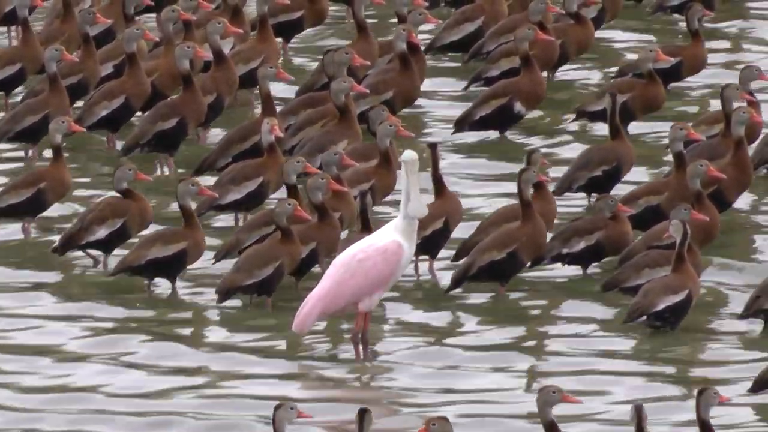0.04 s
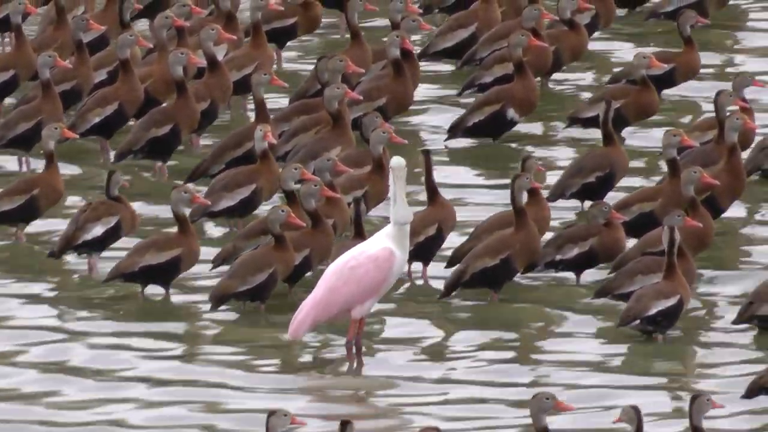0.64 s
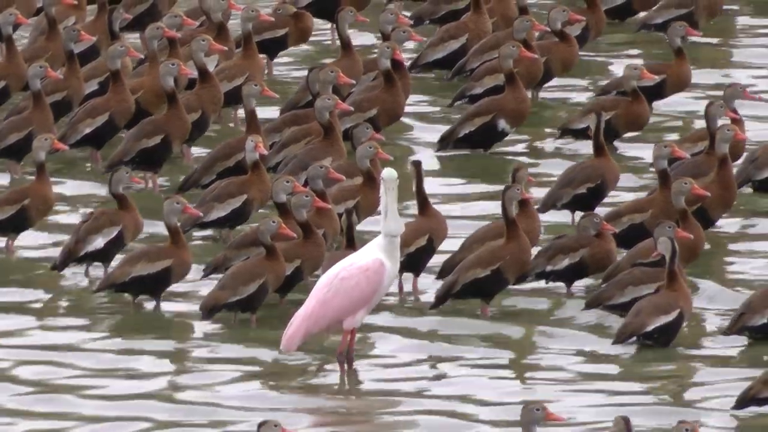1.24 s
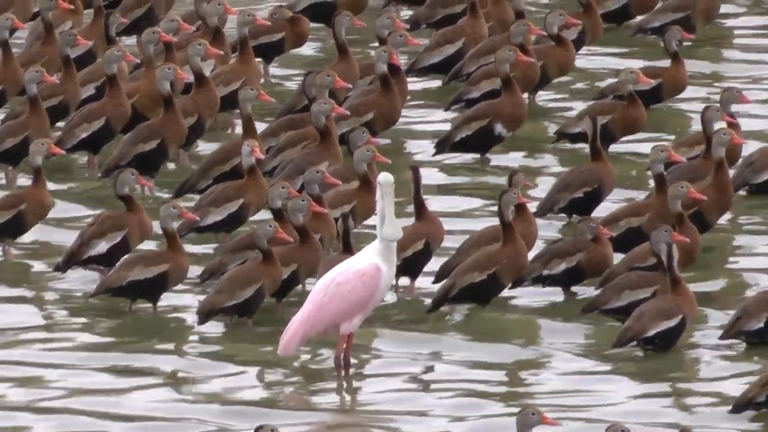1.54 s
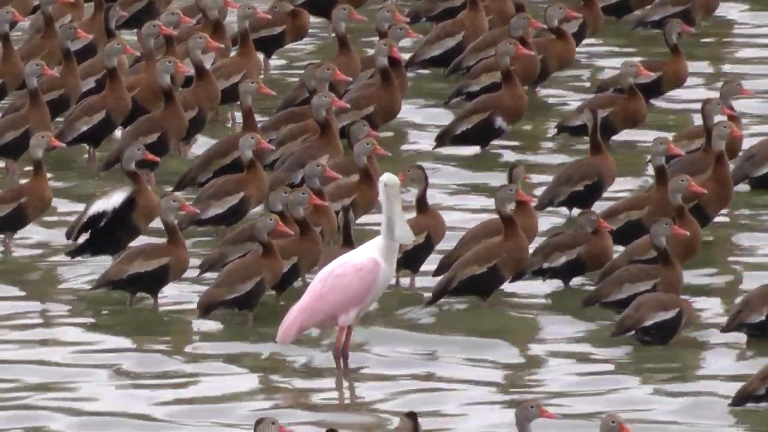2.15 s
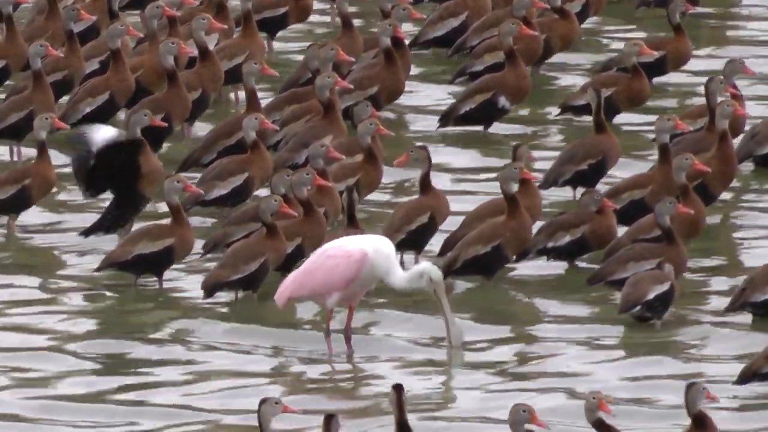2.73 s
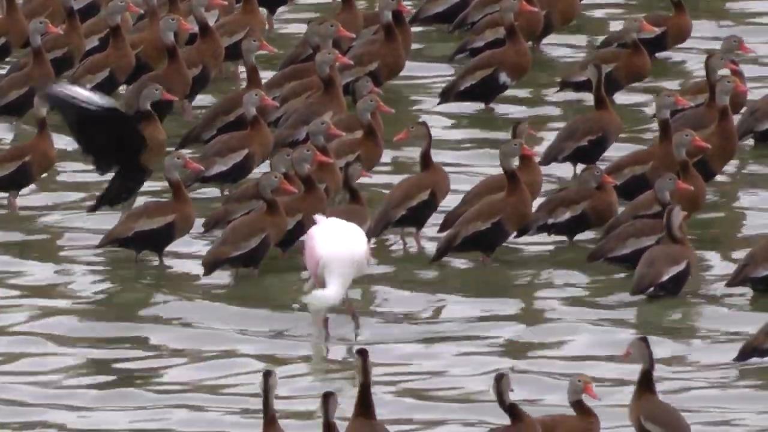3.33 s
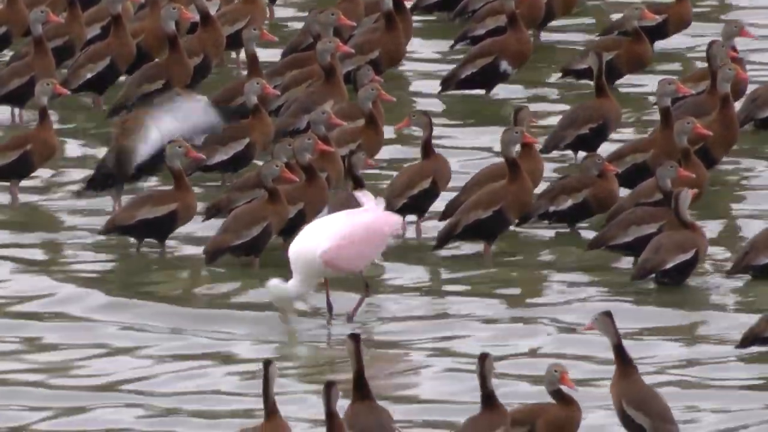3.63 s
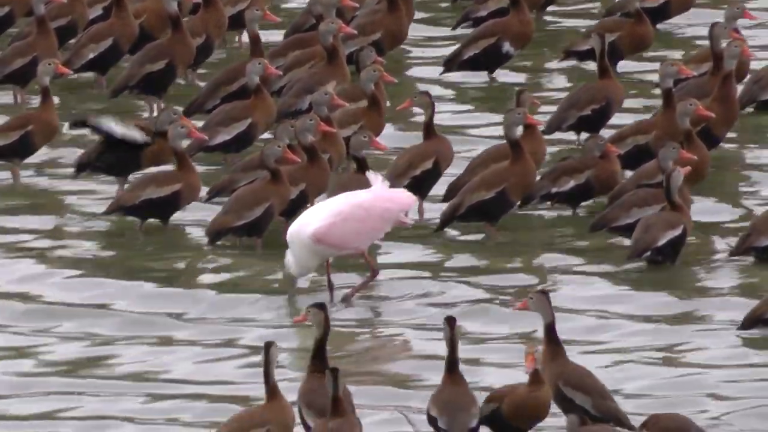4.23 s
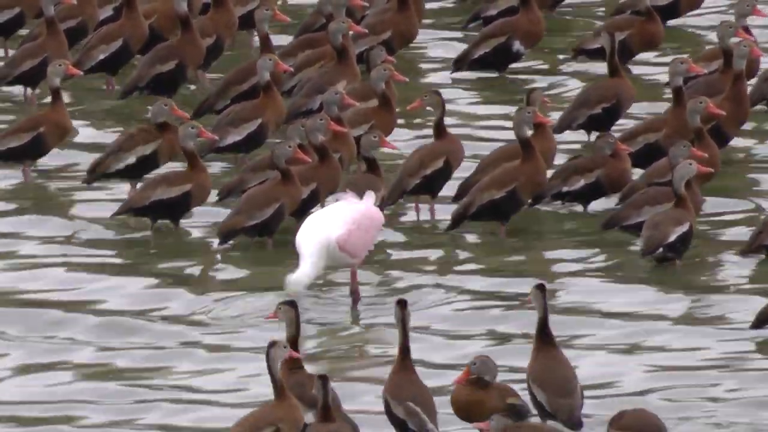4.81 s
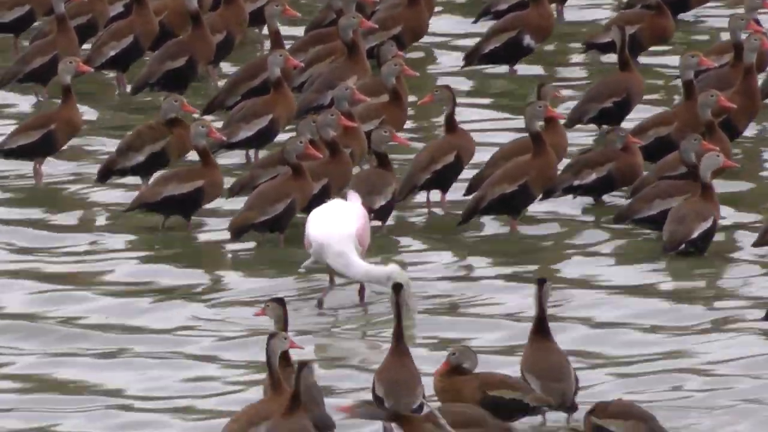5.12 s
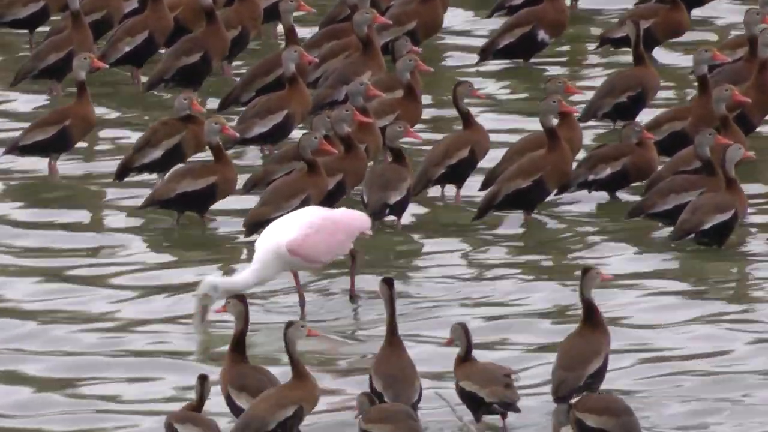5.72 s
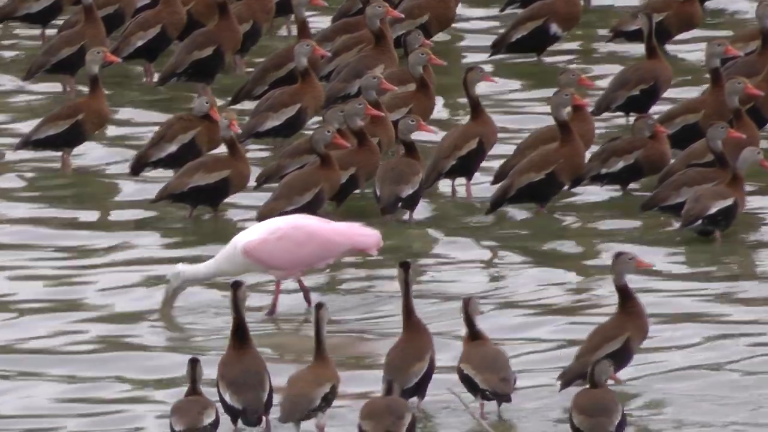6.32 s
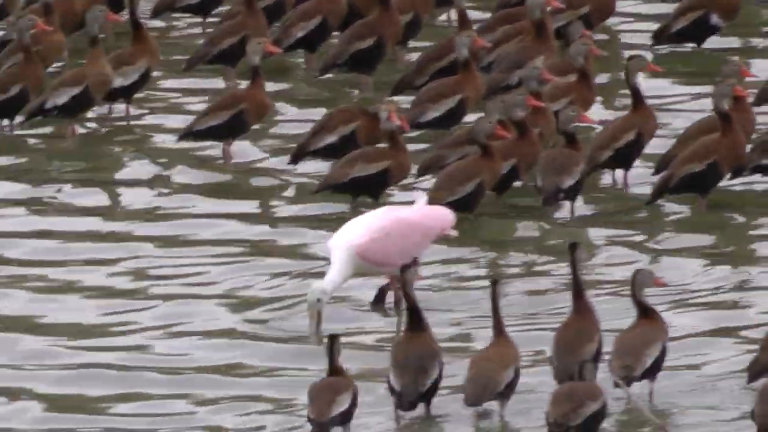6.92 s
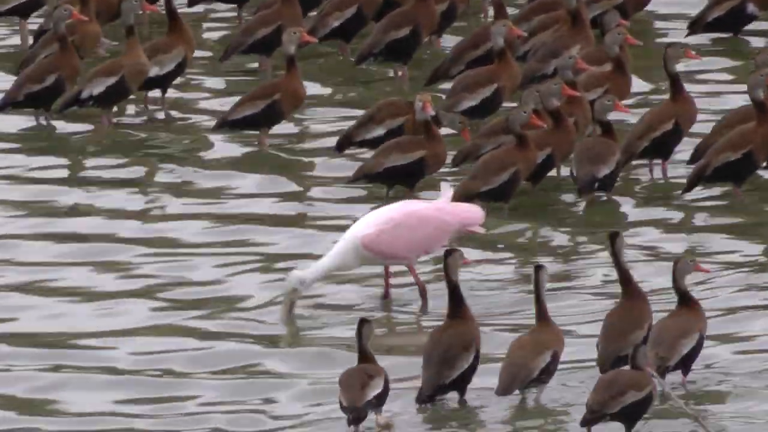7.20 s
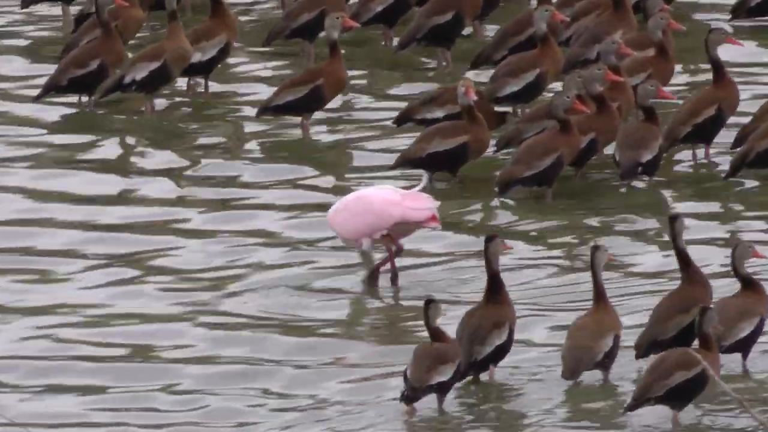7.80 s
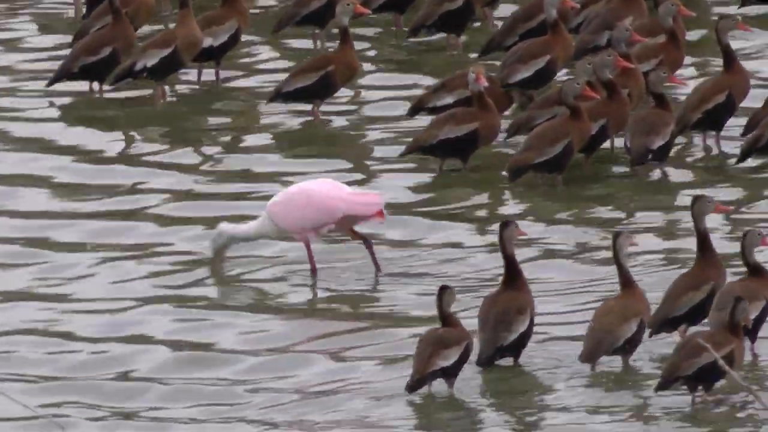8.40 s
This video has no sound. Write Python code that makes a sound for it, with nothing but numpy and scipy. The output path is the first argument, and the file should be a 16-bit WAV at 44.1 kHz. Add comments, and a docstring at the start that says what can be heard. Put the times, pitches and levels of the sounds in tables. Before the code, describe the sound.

Hundreds of ducks whistle and peep, one close duck giving rising cries, while a far engine idles and something small ticks.

```python
"""Hundreds of whistling ducks chatter in shallow water from the start, near birds whistling and chirping
on top, while a distant engine idles unevenly and something small close by ticks about three times a second.
Almost at once, one close duck gives a run of cries that climb in steps. Just after 3 s a far bird adds two
soft, low notes. Around 5 s the close duck cries again and the engine pulls briefly, then slows and fades.
The flock and the ticking carry on to the end."""
import sys
import numpy as np
from scipy import signal
from scipy.fft import rfft, irfft, next_fast_len
from scipy.io import wavfile
from scipy.ndimage import uniform_filter1d, map_coordinates

SR = 44100
rng = np.random.default_rng(int(sys.argv[2]) if len(sys.argv) > 2 else 0)


def pcm_store(signal):
    """Save signal as 16-bit PCM."""
    levels = np.round(np.clip(np.atleast_2d(signal), -1, 1) * 32767)
    wavfile.write(sys.argv[1], SR, levels.astype(np.int16).T)


N = 377055

# how well a duck's throat lets each frequency out: frequency_hz, gain_db
THROAT_TONE = [(1200, -67), (1700, -15.5), (2300, 0), (6500, 0.5), (8000, -4), (10500, -11.5), (12000, -19),
               (16000, -38)]


def amp(db):
    """Turn decibels into a number to multiply by."""
    return 10 ** (np.asarray(db) / 20)


def unit(x):
    """Scale a sound to an average (rms) level of 1."""
    return x / np.sqrt(np.mean(x ** 2) + 1e-20)


def along(points, hz):
    """Read between the rows of a (frequency_hz, value) table, with octaves evenly spaced."""
    known_hz, values = np.transpose(points)
    return np.interp(np.log(hz + 1), np.log(known_hz + 1), values)


def curves(rows):
    """Turn each column after the time into a line with one value per sample."""
    times, *columns = np.transpose(rows)
    return [np.interp(np.arange(N) / SR, times, column) for column in columns]


def wobble(rate, size):
    """A smooth curve through `rate` random values a second."""
    return map_coordinates(rng.standard_normal(int(size * rate / SR) + 4), [np.arange(size) * rate / SR])


def filtered(x, response):
    """Multiply each frequency in a sound by response(hz)."""
    size = next_fast_len(N + SR // 2)
    return irfft(rfft(x, size) * response(np.fft.rfftfreq(size, 1 / SR)), size)[..., :N]


def coloured(x, tone):
    """Shape a sound's tone with a (frequency_hz, gain_db) table."""
    return filtered(x, lambda hz: amp(along(tone, hz)))


def noise(tone):
    """Stereo noise with the given tone, at an average level of 1."""
    # stereo width of the noise; the high treble is nearly mono: frequency_hz, side_db
    stereo_width = [(60, -13.5), (250, -10.5), (700, -8), (3000, -11.5), (8000, -13.5), (12000, -43)]
    middle, side = coloured(rng.standard_normal((2, N)), tone)
    side = coloured(side, stereo_width)
    return unit(np.array([middle + side, middle - side]))


def add(out, start_s, sound, pan_db):
    """Mix a sound in at start_s, pan_db louder on the left."""
    start = int(start_s * SR)
    first, end = max(start, 0), min(start + len(sound), N)
    if end > first:
        out[:, first:end] += amp([[pan_db / 2], [-pan_db / 2]]) * sound[first - start:end - start]


def open_air():
    """A faint, steady rush, a little louder on the left."""
    # tone of the air: frequency_hz, gain_db
    air_tone = [(100, 4.5), (500, -4), (620, -1.5), (800, 5), (950, -11), (1280, -16), (1420, -3),
                (1570, -14.5), (3000, -2.5), (8000, -54), (12000, -26.5), (16000, -26.5)]
    return amp(-56.5) * noise(air_tone) * amp([[.8], [-.8]])


def far_flock(count=1700, spread_db=3.5, overtone_db=-8):
    """Many birds give short rounded chirps at random, a few a longer note; the farthest melt into a rush."""
    # how the flock swells and sinks: time_s, level_db
    flock_levels = [(0, -46.5), (1.5, -48.5), (2.6, -46), (3.8, -50), (5.5, -47.5), (6.5, -50),
                    (7.1, -50.5), (7.8, -48), (8.55, -49)]
    # tone of the chatter: frequency_hz, gain_db
    chatter_tone = [(900, -51), (1550, -13), (1850, 1.5), (2300, 1.5), (2900, -0.5), (3500, -1.5),
                    (4400, 0), (6600, -5.5), (8500, -17), (11000, -21.5), (15000, -40)]
    calls = np.zeros((2, N))
    birds = zip(rng.random((count, 3)), rng.standard_normal((count, 4)))
    for (when, high, long), (loud, pan, bend, tilt) in birds:
        length_s = .035 + .035 * long + .07 * long ** 8
        place = np.linspace(-1, 1, int(length_s * SR))  # -1 at the start of the note, 1 at its end
        pitch = 2300 * 2.9 ** high * np.exp(-(.17 + .05 * bend) * place ** 2 + .08 * tilt * place)
        phase = 2 * np.pi * np.cumsum(pitch) / SR
        voice = (np.sin(phase) + amp(overtone_db) * np.sin(2 * phase)) * (1 - place ** 4)
        add(calls, when * N / SR - length_s / 2, amp(spread_db * min(loud, 1.5)) * voice, 2.8 * pan - .8)
    level_db, = curves(flock_levels)
    rush = .62 * noise(chatter_tone)
    return amp(level_db - 1) * (unit(coloured(calls, chatter_tone)) + rush)


def duck_voice(pitch, overtone_db, half_db, third_db, jitter, flutter_db, break_db):
    """A whistle with overtones that come and go, and weak extra tones halfway between them."""
    size = len(pitch)
    phase = 2 * np.pi * np.cumsum(pitch * (1 + jitter * wobble(351, size))) / SR
    shrill_db = .85 * overtone_db + third_db  # a strong overtone makes the higher ones strong too
    # tones around the whistle: pitch_multiple, level_db
    tones = [(.5, half_db), (1.5, half_db - 8), (2, overtone_db),
             (2.5, shrill_db - 9), (3, shrill_db), (4, shrill_db - 4)]
    # overtones swell and dip as the pitch glides, in ripples about 1881 Hz apart
    ripple = 2 * np.pi * pitch / 1881 * (1 + rng.standard_normal() / 10)
    extras = 0
    for multiple, db in tones:
        level_db = db + 4 * np.cos(multiple * ripple) + break_db * np.minimum(wobble(52, size), 1)
        extras += amp(level_db) * np.sin(multiple * phase) * (multiple * pitch < SR / 2)
    # a gliding note flutters more than a held one
    glide = np.minimum(np.abs(uniform_filter1d(np.gradient(pitch), size=400)) * SR / 20000, 1)
    flutter = amp(flutter_db * (.35 + glide) * wobble(160, size))
    return np.sqrt(2) * (np.sin(phase) + extras) * flutter


def whistle_shape(length_s, early_hz, late_hz, sag):
    """Pitch and strength of a held note: it swings up, drifts steadily and drops away."""
    t = np.arange(int(length_s * SR)) / SR
    edge_s = min(length_s / 3, .036)
    rise = np.clip(1 - t / edge_s, 0, 1)
    fall = np.clip(1 - (length_s - t) / edge_s, 0, 1)
    held_hz = early_hz + (late_hz - early_hz) * (t - edge_s) / (length_s - 2 * edge_s)
    return held_hz * (1 - sag * (.87 * rise ** 2 + fall ** 2)), 1 - np.maximum(rise, fall) ** 3.7


def chirp_shape(length_s, pitch_hz, glide, arch=.0893):
    """Pitch and strength of a short note: one arch, tilted by the glide (a share of the pitch)."""
    place = np.linspace(-1, 1, int(length_s * SR))
    return pitch_hz * (1 + glide * place / 2 - arch * place ** 2), 1 - np.abs(place) ** 4


def near_notes():
    """Every whistle, chirp and peep as (start_s, pitch, strength, level_db, overtone_db)."""
    # held whistles, whose ends sag in pitch:
    # start_s, length_s, early_hz, late_hz, sag_share, level_db, overtone_db
    whistles = [(-.03, 0.15, 3436, 3665, 0.11, -35.5, -16.5), (-.03, .17, 2984, 2956, 0.18, -40, -26),
                (0.182, 0.082, 2990, 2800, 0.06, -44, -14), (0.183, 0.11, 4320, 4150, 0.4, -42.5, -29),
                (.27, 0.085, 3400, 3200, 0, -42.5, -32), (0.515, 0.12, 7300, 7850, .08, -54, -28),
                (1.013, .185, 2770, 2730, 0.12, -41.5, -25.5), (1.961, 0.16, 2640, 3060, 0.03, -46.5, -21),
                (2.355, 0.24, 3000, 3420, 0.4, -48.5, -2.5), (2.68, 0.14, 3110, 3120, 0.13, -34.5, -24),
                (2.879, 0.17, 3280, 3350, 0.37, -43, -8), (4.378, 0.12, 2780, 2620, 0.08, -54, -12),
                (4.706, 0.12, 3003, 3023, 0, -42.5, -10.5), (4.814, 0.082, 3560, 3690, 0, -42, -5.5),
                (5.491, .095, 4230, 4120, .12, -51.5, -22), (5.762, 0.13, 3173, 3185, 0.07, -47.5, -13),
                (6.153, 0.16, 2775, 2790, 0, -53, -8), (6.441, .195, 2865, 2965, .15, -50, -35),
                (6.69, .095, 2970, 2870, 0.2, -55, -18), (7.206, 0.11, 3220, 3540, 0, -54, -30),
                (7.265, .12, 2960, 3080, 0.18, -50.5, -23), (7.314, 0.093, 4460, 4660, 0.14, -52, -22),
                (7.44, .13, 2666, 2637, 0.06, -44, -28), (7.64, 0.096, 3166, 3025, .05, -48.5, -18),
                (7.689, 0.222, 2890, 2997, 0.2, -40.5, -36), (7.984, 0.094, 2964, 2890, 0.17, -42.5, -35)]
    for start_s, length_s, early_hz, late_hz, sag, level_db, overtone_db in whistles:
        yield start_s, *whistle_shape(length_s, early_hz, late_hz, sag), level_db, overtone_db
    short_notes = [*single_chirps(), *peeps(), *stray_chirps()]
    for middle_s, length_s, pitch_hz, glide, level_db, overtone_db in short_notes:
        yield middle_s - length_s / 2, *chirp_shape(length_s, pitch_hz, glide), level_db, overtone_db


def near_ducks():
    """Birds at the front of the flock sing their notes with a slightly wavering pitch."""
    out = np.zeros((2, N))
    for start_s, pitch, strength, level_db, overtone_db in near_notes():
        pitch = pitch * (1 + .004 * wobble(35, len(pitch)))
        voice = duck_voice(pitch, overtone_db, half_db=-15, third_db=-5,
                           jitter=.004, flutter_db=1.4, break_db=3)
        add(out, start_s, amp(level_db) * strength * voice, pan_db=rng.normal(-1.9, 1))
    return coloured(out, THROAT_TONE)


def engine(scatter_db=.9, muffle_hz=240):
    """Firings thump through the exhaust over a rumble, strong and weak by turns while the engine idles."""
    # engine speed: time_s, firings_per_s, share_lost (by every second firing)
    speeds = [(0, 33.22, .8), (5.0, 33.22, .8), (5.2, 35.5, .1), (5.5, 35.5, .1), (6.4, 31.7, .15),
              (7.0, 30.7, .15), (8.0, 26.8, .15), (8.55, 26.3, .15)]
    # engine loudness: time_s, exhaust_db, rumble_db
    levels = [(0, -44, -47.5), (4.92, -45, -49.5), (5.1, -52.5, -50), (5.25, -43.5, -50),
              (5.55, -42.5, -50), (5.8, -53.5, -49.5), (6.1, -55, -49.5), (6.8, -55.5, -53),
              (7.6, -55.5, -52.5), (8.55, -66, -52.5)]
    # where the exhaust pipe rings: frequency_hz, width_hz, gain_db
    pipe_rings = [(27.2, 3.3, -5), (63, 0.74, 10), (101.8, 10, 0.5), (143.1, 19, 8), (170.8, 11, -4)]
    # tone of the rumble: frequency_hz, gain_db
    rumble_tone = [(20, -3.5), (60, -11), (110, 2.5), (190, -0.5), (260, -4.5), (380, -8), (500, -20.5),
                   (1100, -24), (1600, -34.5), (4000, -59)]

    def exhaust(hz):
        """The pipe rings at a few low frequencies and muffles the high ones."""
        ringing = sum((-1) ** k * amp(db) * 1j * hz * width / (centre ** 2 - hz ** 2 + 1j * hz * width)
                      for k, (centre, width, db) in enumerate(pipe_rings))
        return ringing / (1 + (hz / muffle_hz) ** 6)

    rate, lost = curves(speeds)
    exhaust_db, rumble_db = curves(levels)
    fired = np.flatnonzero(np.diff(np.floor(np.cumsum(rate) / SR + .5)))  # the sample of each firing
    weak = np.arange(len(fired)) % 2 == 1
    firings = np.zeros(N)
    firings[fired] = (1 - lost[fired] * weak) * amp(scatter_db * rng.standard_normal(len(fired)))
    firings /= np.sqrt(1 + (1 - lost) ** 2)  # uneven firing keeps the same power
    thumps = unit(filtered(firings, exhaust))
    return amp(exhaust_db) * thumps + amp(rumble_db + 2) * noise(rumble_tone)


def ticks(first_s=.0245, spacing_s=.3398):
    """Tick and tock, each a brief scrape and ring: every second one is softer and duller."""
    # how the ticking part rings: pitch_hz, level_db, fade_s (time to drop 60 dB)
    rings = [(1842, -7, 0.053), (2210, 6.5, 0.013), (2810, 1.5, 0.041), (4600, -1, 0.018)]
    out = np.zeros((2, N))
    t = np.arange(SR // 16) / SR
    for k, start_s in enumerate(np.arange(first_s, N / SR, spacing_s)):
        ring = sum(amp(db + rng.standard_normal() - 60 * t / fade_s)
                   * np.sin(2 * np.pi * (hz * t + rng.random())) for hz, db, fade_s in rings)
        scrape = rng.standard_normal(len(t)) * amp(-60 * np.maximum(t - .004, 0) / .035)
        ring_db, scrape_db = (-41, -58) if k % 2 else (-38, -48)
        tick = amp(ring_db) * ring + amp(scrape_db) * uniform_filter1d(scrape, size=2)
        add(out, start_s, tick * (1 - np.exp(-t / .001)), pan_db=0)
    return out


def bank_echo(sound):
    """Water and bank send back a thin, blurred echo whose treble dies first."""
    # how long the echo lasts: frequency_hz, fade_s (time to drop 60 dB)
    fade_times = [(500, 0.6), (3000, 0.62), (10000, 0.15)]
    hz, t, spectrum = signal.stft(rng.standard_normal((2, SR // 2)), SR, nperseg=256)
    fade = amp(-60 * t / along(fade_times, hz)[:, None])
    tail = signal.istft(spectrum * fade, SR, nperseg=256)[1]
    return signal.fftconvolve(sound, tail / np.linalg.norm(tail[0]), axes=1)[:, :N]


def close_duck(foot_hz=2422, pipe_hz=3150, step_hz=680, pull=.53, fall_s=.034, fall_db=8):
    """Each cry climbs, holds and drops; going up, it clings to one windpipe resonance after another."""
    # the cries: start_s, climb_s, hold_s, top_hz, level_db, loss_db (at the top)
    cries = [(.165, 0.052, 0.011, 4990, -42.5, 1), (0.341, 0.089, 0.056, 5204, -32.5, -0.5),
             (0.53, 0.065, 0.026, 4540, -31.5, 6.5), (0.674, 0.042, 0.017, 3800, -33, 3.5),
             (0.819, 0.019, 0.015, 3200, -38.5, -2), (5.061, .05, 0.0046, 4600, -40.5, 19),
             (5.193, .064, .016, 5700, -34, 16.5), (5.313, .053, 0.009, 5200, -34.5, 19),
             (5.436, 0.046, .005, 5020, -34.5, 27), (5.605, .03, 0.011, 3660, -44, 6)]
    out = np.zeros((2, N))
    for start_s, climb_s, hold_s, top_hz, level_db, loss_db in cries:
        t = np.arange(0, climb_s + hold_s + fall_s, 1 / SR)
        up = np.clip(t / climb_s, 0, 1)
        down = np.clip((t - climb_s - hold_s) / fall_s, 0, 1)
        aim_hz = uniform_filter1d(foot_hz + (top_hz - foot_hz) * up ** .9 * (1 - down ** .9), size=300)
        climbing = uniform_filter1d(1. * (t < climb_s + .01), size=300)
        # distance from the pitch of the nearest step
        miss_hz = (aim_hz - pipe_hz + step_hz / 2) % step_hz - step_hz / 2
        pitch = aim_hz - climbing * pull * uniform_filter1d(miss_hz, size=60)
        pitch *= 1 + .005 * wobble(35, len(t))
        # the voice swells, dips between steps, strains near the top and thins out on the way down
        swell_db = 1 - 9 * np.clip(1 - t / .017, 0, 1)
        dip_db = 5 * np.sin(np.pi * miss_hz / step_hz) ** 4
        strength = amp(level_db + swell_db - dip_db - loss_db * up ** 3 - fall_db * np.sqrt(down))
        fade = np.clip(np.minimum(t, t[-1] - t) / .0076, 0, 1)
        # strain turns it hoarse: the extra tones lose less than the whistle itself
        rasp_db = .47 * loss_db * up
        voice = duck_voice(pitch, overtone_db=-22 + rasp_db - fall_db * down, half_db=-16 + rasp_db / 2,
                           third_db=-2, jitter=.005, flutter_db=2, break_db=6)
        add(out, start_s, strength * fade * voice, pan_db=-.5)
    return coloured(out, THROAT_TONE)


def stray_chirps(count=50, low_hz=2800, high_hz=5800, overtone_db=-12):
    """Birds a few rows back chirp softly at random."""
    for (when, high), (long, tilt, loud) in zip(rng.random((count, 2)), rng.standard_normal((count, 3))):
        pitch_hz = low_hz * (high_hz / low_hz) ** high
        yield when * N / SR, .05 * np.exp(long / 4), pitch_hz, .14 * tilt, -54 + 2 * loud, overtone_db


def single_chirps():
    """Near birds chirp once; the higher the chirp, the purer its tone."""
    # the chirps: middle_s, length_s, pitch_hz, glide_share, level_db
    chirps = [(.79, 0.08, 2950, -.07, -46.5), (0.903, .07, 4150, 0.41, -49),
              (0.979, .04, 5060, -0.033, -47.5), (1.157, 0.052, 2960, -0.28, -43.5),
              (1.306, 0.067, 2870, -0.16, -44), (1.774, 0.051, 5000, -0.15, -46),
              (2.413, 0.048, 5540, -.07, -46.5), (2.477, .05, 5250, -0.071, -46),
              (2.485, .07, 4220, 0.11, -44.5), (2.581, .055, 4500, 0.19, -45),
              (2.936, 0.074, 4420, -0.091, -49), (3.104, .05, 4380, .3, -48),
              (3.139, 0.047, 3260, -0.068, -40.5), (3.233, .032, 4450, -.06, -46),
              (3.253, 0.042, 3000, -0.17, -44.5), (3.487, .1, 4770, -0.011, -50.5),
              (3.632, 0.081, 3960, 0.062, -49.5), (4.004, 0.068, 5950, .12, -50.5),
              (4.418, 0.078, 4180, 0.041, -49.5), (5.003, 0.052, 3640, -0.069, -49),
              (5.927, 0.044, 5040, 0.0024, -50.5), (6.003, 0.052, 5720, .05, -44.5),
              (6.008, 0.037, 3620, -0.076, -40), (6.908, .06, 3680, 0, -50),
              (7.521, .05, 5440, -0.13, -43.5), (7.963, 0.054, 3000, -0.085, -48),
              (8.205, 0.072, 2920, -0.099, -46.5), (8.206, 0.031, 4420, -.03, -44),
              (8.26, 0.049, 4600, -.1, -50), (8.31, .07, 3690, 0.0073, -45),
              (8.307, 0.068, 5230, 0.11, -42.5), (8.548, .065, 4880, 0.072, -40.5)]
    for middle_s, length_s, pitch_hz, glide, level_db in chirps:
        overtone_db = -14.5 - 6 * np.log2(pitch_hz / 3000)
        yield middle_s, length_s, pitch_hz, glide, level_db, overtone_db


def peeps(length_s=.041, taper_db=1.5):
    """Near birds give runs of quick, evenly spaced peeps, softer at the ends of a run."""
    # the runs, timed by the middles of their peeps:
    # first_s, last_s, rough_spacing_s, pitch_hz, glide_share, level_db, overtone_db
    runs = [(1.166, 1.268, .102, 4530, -0.074, -43.5, -33), (1.363, 1.572, .102, 4610, .04, -41, -12.5),
            (1.51, 1.912, .08, 3070, 0.142, -51, -14), (1.634, 1.841, .102, 4470, -0.11, -42, -20),
            (7.637, 8.153, .104, 4535, -0.087, -46.5, -28)]
    for first_s, last_s, spacing_s, pitch_hz, glide, level_db, overtone_db in runs:
        count = round((last_s - first_s) / spacing_s) + 1
        for middle_s, place in zip(np.linspace(first_s, last_s, count), np.linspace(-1, 1, count)):
            peep_hz = pitch_hz * (1 + .006 * rng.standard_normal())
            yield middle_s, length_s, peep_hz, glide, level_db - taper_db * place ** 2, overtone_db


def low_bird():
    """A far bird sings two soft, plain notes below the pitch of the flock."""
    # its notes: middle_s, length_s, pitch_hz, glide_share, level_db
    notes = [(3.292, 0.067, 1460, 0, -62), (3.443, 0.053, 1500, -.04, -59)]
    out = np.zeros((2, N))
    for middle_s, length_s, pitch_hz, glide, level_db in notes:
        pitch, strength = chirp_shape(length_s, pitch_hz, glide)
        voice = np.sqrt(2) * np.sin(2 * np.pi * np.cumsum(pitch) / SR)
        add(out, middle_s - length_s / 2, amp(level_db) * strength * voice, pan_db=0)
    return out


def scene():
    """Mix everything; only the near ducks and the close one get an echo."""
    ducks = near_ducks() + close_duck()
    return ducks + open_air() + amp(-22.5) * bank_echo(ducks) + far_flock() + low_bird() + engine() + ticks()


def record(dry):
    """Cut away everything above 16500 Hz."""
    return filtered(dry, lambda hz: hz < 16500)


dry = scene()
out = record(dry)
pcm_store(out)
```